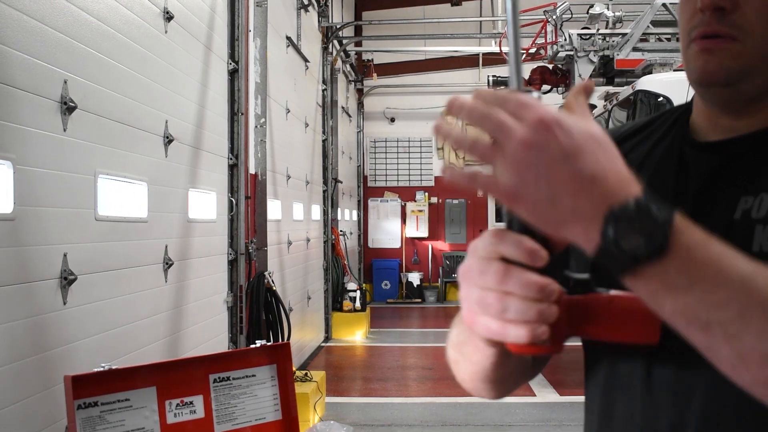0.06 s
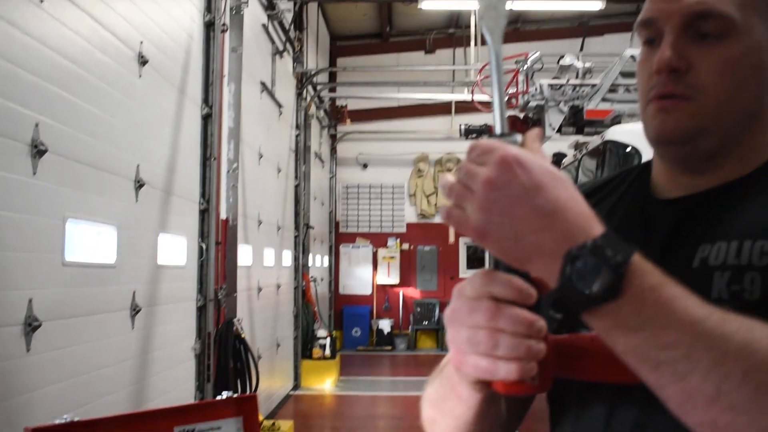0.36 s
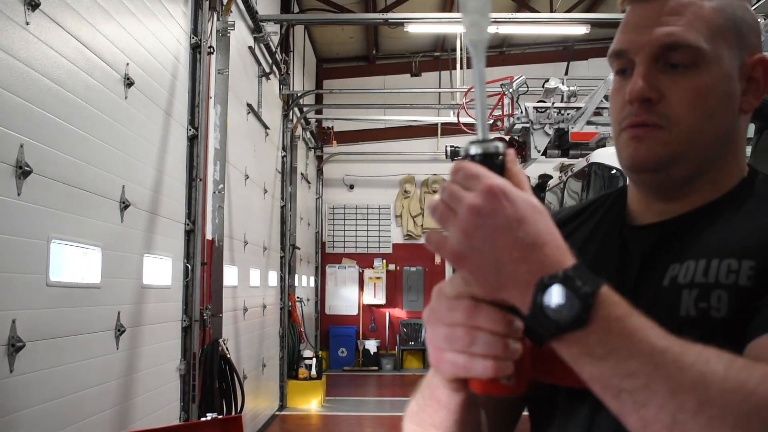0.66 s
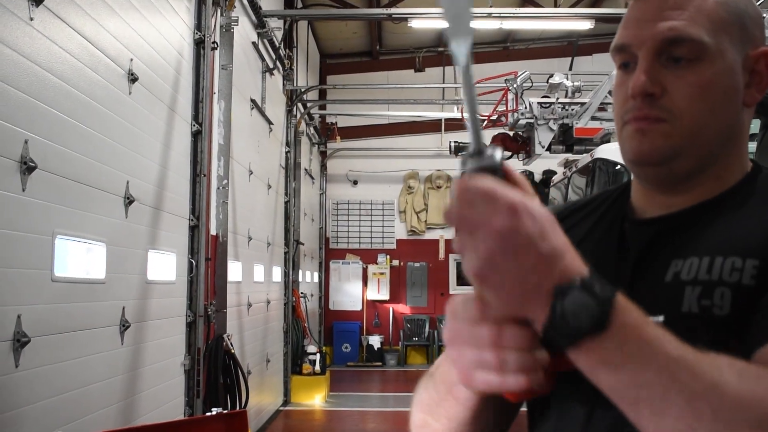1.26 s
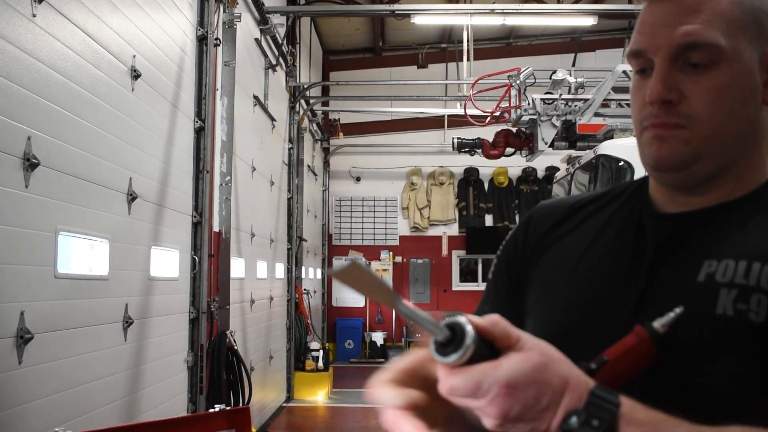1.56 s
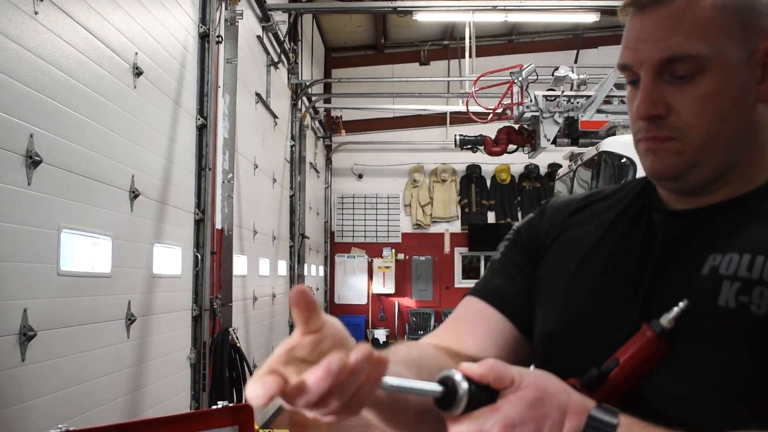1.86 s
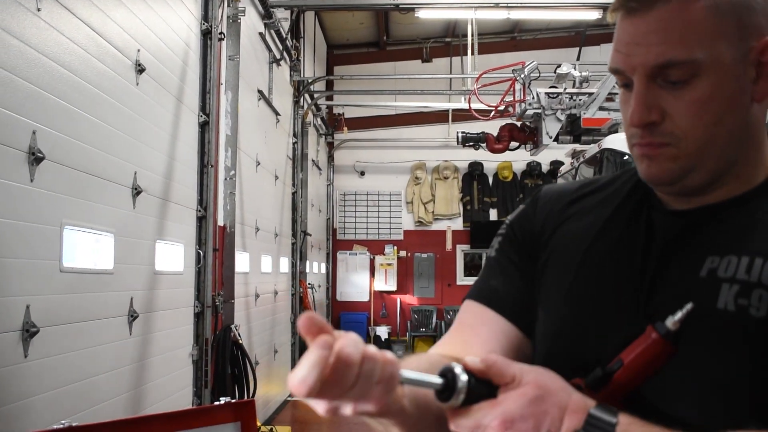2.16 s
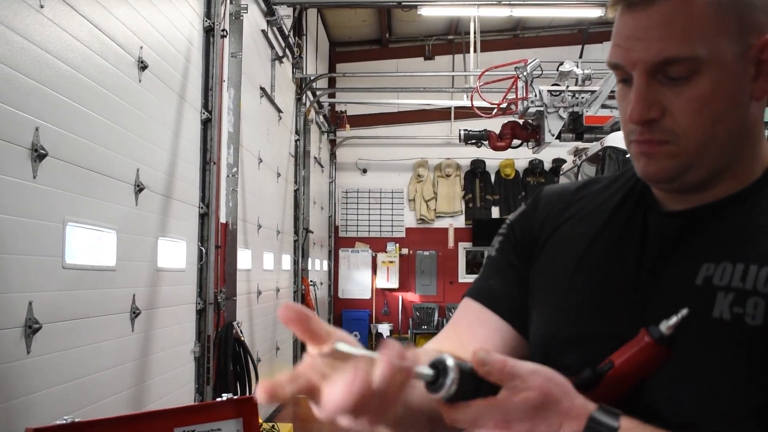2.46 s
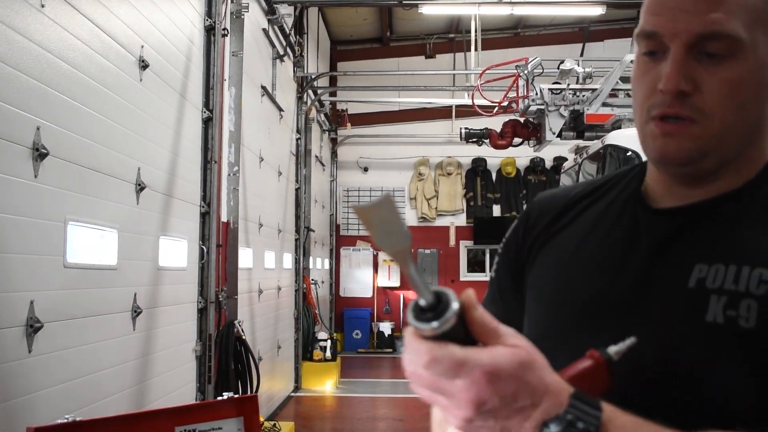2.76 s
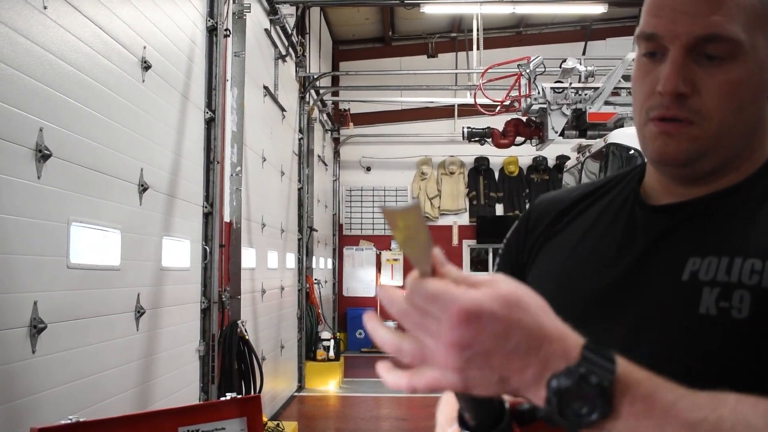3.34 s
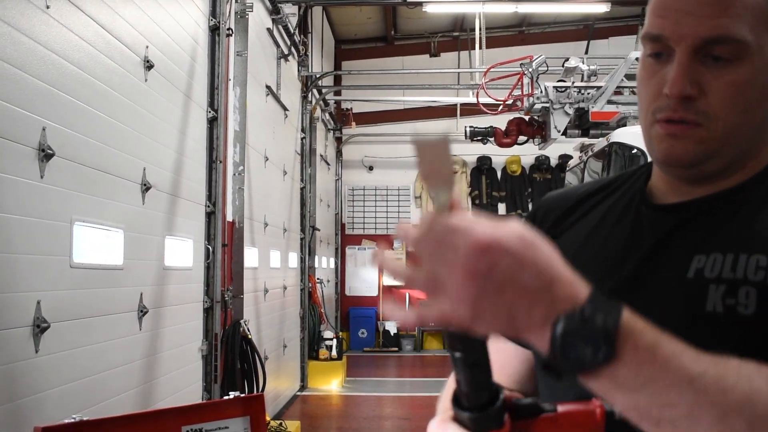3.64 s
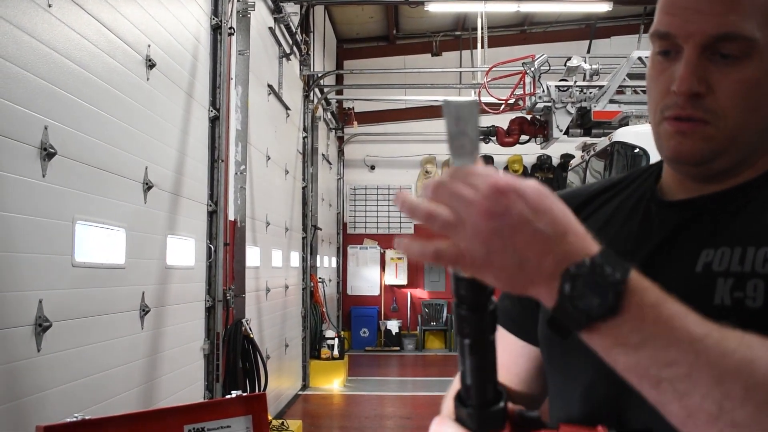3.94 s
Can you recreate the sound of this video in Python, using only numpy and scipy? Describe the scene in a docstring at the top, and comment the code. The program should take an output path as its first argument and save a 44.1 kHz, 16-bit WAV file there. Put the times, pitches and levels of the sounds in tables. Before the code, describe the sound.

An air hammer's steel parts are handled close to the microphone. Its collar unscrews in gritty clicks, the chisel bit scrapes out and taps, then both clank back on, in a large, echoing garage with ventilation hum.

```python
"""An air hammer is handled up close in a large, hard-walled garage, over a bed of ventilation and mains hum.
First its retainer collar is unscrewed in gritty clicks. At 1.7 s the chisel bit scrapes out of the barrel,
then taps the retainer. From 3.1 s bit and retainer clank back on, among duller knocks of the loose parts.
Every steel contact is a short crack plus a hand-damped ring, trailed by the hall. After the loudest clanks
a limiter ducks the whole mix and lets it swell back."""
import sys
import numpy as np
from scipy import signal
from scipy.fft import rfft, irfft, next_fast_len
from scipy.io import wavfile
from scipy.ndimage import uniform_filter1d, minimum_filter1d, map_coordinates

SR = 44100
rng = np.random.default_rng(int(sys.argv[2]) if len(sys.argv) > 2 else 0)


def put_to_file(sound):
    """Save the sound as 16-bit audio at rate SR, in the file named by the first command-line argument."""
    columns = np.atleast_2d(sound).T  # one column per channel
    safe = np.clip(columns, -1, 1)
    whole_steps = np.round(safe * 32767)
    wavfile.write(sys.argv[1], SR, whole_steps.astype(np.int16))


N = 176400  # 4 s

# spectra of the ventilation rush, a hollow drone in the room tone and the housing's thud (f/Hz, level/dB)
VENT_EQ = [(15, -52), (25, -41), (64, -11), (92, -18), (114, -2.5), (149, -5), (200, -2), (326, -7.5),
           (363, -3.5), (405, -10), (560, -8), (677, -7.5), (1040, -5.5), (1840, -5), (4610, -18),
           (6740, -22.5), (16000, -49.5)]
DRONE_EQ = [(200, -14.5), (400, -6.5), (545, -0.5), (620, -4.5), (760, -15), (1500, -52)]
THUD_EQ = [(20, -42), (100, -5), (400, -7), (1000, 10), (1600, -18), (3000, -45)]
# fader ride of the drone (t/s, level/dB)
DRONE_FADER = [(0, -56.5), (.3, -49), (.42, -53), (.52, -49), (.62, -51), (.72, -73), (1.0, -56),
               (1.6, -65), (2.15, -51), (2.5, -71), (2.72, -53), (2.8, -59), (2.86, -48.5), (2.92, -54),
               (3.1, -55.5), (4, -107)]
# steady tones of the hum (f/Hz, level/dB)
HUM_TONES = [(77, -72.5), (120, -64), (1105, -68.5)]
# reverb time of the garage (f/Hz, t60/s)
HALL_DECAY = [(200, 1.2), (2000, 0.95), (5000, 0.72), (8000, 0.68), (11000, .44), (16000, 0.18)]

# cue lists of the steel contacts (t/s, level/dB, crack t60/s, tilt/(dB per octave), ring level/dB)
COLLAR_HITS = [(.1416, -26, 0.0073, -4, -5), (.2023, -33.5, .008, -6, 9), (.2105, -37, 0.0093, -4, 8),
               (.315, -47, .01, -6, 9), (.345, -33, 0.0051, -5, -1), (.496, -33, 0.031, 8, 8),
               (.516, -24.5, 0.0068, 15, 5.5), (.519, -11, 0.0041, 2.5, -6), (.523, -27, 0.023, 2, -3),
               (.722, -39, 0.0093, 18, -7), (.763, -32, 0.013, 15.5, -6), (.881, -25, 0.011, 4.5, 9),
               (.887, -13, 0.0084, -2.5, 0), (.9185, -28, 0.0073, -9, -9), (.9255, -18, 0.03, 0, 8),
               (.9312, -12, 0.019, 3.5, 0.5), (.937, -19, 0.014, -2, 2), (.9465, -22, 0.0095, 1, -9),
               (.9895, -18, 0.012, 4.5, -4), (.993, -16, 0.0081, 1.5, 2.5), (.998, -27, 0.014, -8, 0),
               (1.032, -22.5, 0.025, -1.5, -1.5), (1.040, -17, 0.014, -1, -3), (1.079, -27, 0.013, -5, -5),
               (1.0838, -16.5, 0.01, -3, 2), (1.122, -20.5, 0.018, 0, 5), (1.1295, -21.5, 0.012, 1, -5),
               (1.136, -29, 0.013, 2, 6), (1.1817, -20.5, .014, -3, -2), (1.1867, -24, 0.011, -3, -9),
               (1.2245, -25.5, 0.027, -5, 12), (1.231, -23, 0.026, -3, -2), (1.2363, -24, 0.0056, -4, 3),
               (1.289, -32.5, 0.0097, -6, -9), (1.340, -30, 0.016, -7.5, 7.5), (1.349, -29, 0.026, -5.5, 3),
               (1.449, -33.5, 0.017, -7, 10.5), (1.463, -33, 0.06, -5.5, 10),
               (1.4872, -18, 0.007, 2.5, -20), (1.572, -41, .006, 9, -4)]  # the collar turns
SLIDE_HITS = [(1.7188, -25.5, 0.026, -4, 1), (1.7255, -30, .014, 4, 6), (1.7302, -19, 0.0098, -3, -1),
              (1.7365, -19.5, .006, 0, -4), (1.7913, -24, 0.011, 2, 8), (1.7982, -15, 0.019, 0, -1)]  # the bit scrapes out of the barrel
BIT_HITS = [(2.119, -30, 0.027, 0, -8), (2.1233, -17.5, 0.014, -2.5, -16), (2.138, -23.5, .035, -2, -12),
            (2.155, -30, 0.034, 16, -12), (2.1648, -17.5, 0.0082, -6.5, -10), (2.167, -20, 0.017, 4, 3.5),
            (2.173, -26, .012, -5, 3), (2.2132, -26.5, .006, 16, -18), (2.343, -34.5, .015, 0, -10),
            (2.359, -30.5, 0.037, -3.5, -12), (2.377, -23, 0.062, 6, -10), (2.3852, -6, 0.011, 1.5, -2),
            (2.3907, -23, 0.0074, -5.5, 1)]  # the loose bit taps the retainer
SHANK_HITS = [(3.130, -35.5, 0.065, -6.5, -8), (3.142, -33, 0.015, -9, 4), (3.1585, -24, .022, 1, 3),
              (3.168, 15, 0.0077, -1.1, -1), (3.1745, -7.5, 0.0081, 2, -1), (3.4475, -18.5, .006, 1, -12),
              (3.456, -30, 0.0091, -2, 0), (3.4613, 7.5, 0.0098, 0, 1.5)]  # the bit's shank drops into the barrel
SEAT_HITS = [(3.704, -27, 0.023, -4, 1), (3.726, -19, 0.008, -2, 0), (3.7305, -20.5, 0.016, -2.5, 3),
             (3.7341, 11, 0.0059, 0.5, -6), (3.7375, -8.5, 0.01, 1, 10)]  # the retainer meets the barrel
KNOCK_HITS = [(3.3025, -15.5, 0.014, -1.5, -5), (3.6138, -11, 0.0047, 1.5, 0.5),
              (3.845, -21.5, 0.04, 6, -4), (3.888, -17, 0.0057, -3, 3), (3.9748, -19, 0.01, 2, -19),
              (3.995, -16, 0.046, 3.5, -9)]  # loose parts knock dully
# tone colour of each part's crack (f/Hz, level/dB)
COLLAR_EQ = [(200, -29), (1200, -19.5), (2200, -6), (3400, -7), (5000, -0.5), (6200, 2.5), (8300, -2),
             (9800, -12.5), (12000, -33), (16000, -42)]
SLIDE_EQ = [(200, -23.5), (1200, -15), (2300, -3.5), (3100, -5), (4400, 1), (6000, -2), (7200, -0.5),
            (9500, -8.5), (11800, -24), (16000, -45)]
BIT_EQ = [(60, -33), (330, -21), (900, -19), (2200, -2.5), (3500, -0.5), (5900, -2), (8000, -7),
          (10000, -10), (11800, -35), (13700, -43), (15000, -55)]
SHANK_EQ = [(60, -26), (500, -17.5), (1300, -16.5), (2200, -2.5), (3300, -7.5), (4400, 4), (6000, 2),
            (7500, 6), (10800, -5.5), (11800, -18), (13000, -15), (16000, -27.5)]
SEAT_EQ = [(100, -31), (400, -12), (1000, -15.5), (1500, -11.5), (2050, -15), (3000, -7.5), (4300, -5.5),
           (5400, -6.5), (6800, 1), (8500, -2.5), (11000, -14), (13000, -24), (16000, -27)]
KNOCK_EQ = [(200, -26), (480, -16), (750, 3.5), (1150, -1), (1700, -1.5), (3300, -1), (5000, 3), (6200, 1),
            (8800, -8.5), (10500, -21), (16000, -42)]
# ringing modes of each part (f/Hz, level/dB, t60/s)
COLLAR_RING = [(2010, -32, 0.024), (4910, -12, 0.03), (5230, -12.5, 0.024), (6860, -34, 0.017),
               (7330, -16, 0.022), (8230, -14, 0.023), (10870, -32.5, 0.016), (12650, -47, 0.016),
               (14400, -51, 0.016)]
SLIDE_RING = [(2210, -22, .02), (4470, -24, 0.0096), (4930, -13.5, 0.031), (6860, -11.5, 0.027),
              (7660, -18.5, 0.034), (10200, -26.5, 0.03)]
BIT_RING = [(2220, -26, .03), (4350, -26, 0.022), (4800, -26, 0.022), (7070, -14, 0.022),
            (9870, -16.5, 0.049), (13550, -38, 0.027)]
SHANK_RING = [(2370, -26, 0.024), (4360, -17.5, 0.0072), (4950, -19, 0.034), (7140, -11.5, 0.029),
              (7410, -12, 0.037), (9350, -28, 0.029), (10840, -20.5, 0.023), (14730, -29, .025)]
SEAT_RING = [(2024, -17.5, 0.016), (4330, -15.5, 0.021), (6340, -29, .025), (6670, -11.5, 0.025),
             (6880, -19.5, 0.052), (7800, -19, .05), (9180, -17, 0.037), (9260, -20.5, 0.048)]
KNOCK_RING = [(1510, -13, 0.016), (1810, -11, 0.0084), (4750, -20, 0.017), (6300, -7, 0.0092),
              (8740, -5, 0.0071)]

VENT_DB = -49
NEAR_ECHO_S, NEAR_ECHO_DB, DOOR_ECHO_S, DOOR_ECHO_DB = 0.0056, -12.5, 0.02, -21.5
HALL_BUILD_S = 0.0075
THUD_S, THUD_DB, THUD_T60_S = 3.4613, -19, 0.014
RISE_S, RISE_T60_S = 0.00066, 0.014  # attack of a contact with this t60; longer ones scrape in more slowly
CHATTER_DB, CHATTER_T60_S = -11, 0.024  # fine rattle after each contact
EVENNESS = 0.74  # 0-1: how evenly a contact excites all frequencies
RING_SCATTER_DB = 2
CEILING, RELEASE_DB_PER_S, ATTACK_S, HIGH_CUT_HZ = 0.7, 48.5, 0.0006, 16000


def amp(db):
    """Decibels to gain."""
    return 10 ** (np.asarray(db) / 20)


def decay(t, t60):
    """An exponential fade, 60 dB down at t60."""
    return np.exp(-np.log(1000) * t / t60)


def along(points, hz):
    """Read (Hz, value) points on a log frequency axis."""
    freqs, values = np.transpose(points)
    return np.interp(np.log(hz + 1), np.log(freqs + 1), values)


def wobble(rate):
    """A smooth random drift with `rate` knots a second."""
    knots = rng.standard_normal(int(N * rate / SR) + 4)
    return map_coordinates(knots, [np.arange(N) * rate / SR])


def filtered(x, response):
    """EQ x with a gain given as a function of frequency."""
    size = next_fast_len(N + SR // 2)
    return irfft(rfft(x, size) * response(np.fft.rfftfreq(size, 1 / SR)), size)[:N]


def noise(eq):
    """Coloured noise of rms 1."""
    x = filtered(rng.standard_normal(N), lambda hz: amp(along(eq, hz)))
    return x / np.sqrt(np.mean(x ** 2) + 1e-20)


def minimum_phase(gain):
    """A response with this gain and no pre-ring, so attacks stay crisp."""
    cepstrum = irfft(np.log(np.maximum(gain, 1e-6)))
    half = len(cepstrum) // 2
    cepstrum[1:half] *= 2
    cepstrum[half + 1:] = 0
    return np.exp(rfft(cepstrum))


def room_tone():
    """The bed: ventilation rush, slightly unsteady hum and a hollow drone that swells and fades."""
    t = np.arange(N) / SR
    hum = np.zeros(N)
    for hz, db in HUM_TONES:
        peak = np.sqrt(2) * amp(db + 1.4 * wobble(3.83))
        hum += peak * np.sin(2 * np.pi * hz * t + 0.23 * wobble(3))
    drone = amp(np.interp(t, *np.transpose(DRONE_FADER))) * noise(DRONE_EQ)
    ventilation = amp(VENT_DB + 0.13 * wobble(2.33)) * noise(VENT_EQ)
    return ventilation + hum + drone


def hall_tail():
    """One diffuse decay off the hard walls, energy 1; the treble dies first."""
    hz, t, bands = signal.stft(rng.standard_normal(SR), SR, nperseg=256)
    _, tail = signal.istft(bands * decay(t, along(HALL_DECAY, hz)[:, None]), SR, nperseg=256)
    tail *= 1 - np.exp(-(np.arange(len(tail)) / SR / HALL_BUILD_S) ** 2)
    return tail / np.linalg.norm(tail)


def garage(x, wet_db, size=8192):
    """Direct sound, slaps off the body and the door, and a hall tail that changes as the tool moves."""
    hall = np.zeros(N + 2 * SR)
    for start in range(0, N, size):
        block = x[start:start + size]
        if np.any(block):
            reverb = signal.fftconvolve(block, hall_tail())
            hall[start:start + len(reverb)] += reverb
    near_slap = amp(NEAR_ECHO_DB) * np.pad(x, (round(NEAR_ECHO_S * SR), 0))[:N]
    door_slap = amp(DOOR_ECHO_DB) * np.pad(x, (round(DOOR_ECHO_S * SR), 0))[:N]
    return x + near_slap + door_slap + amp(wet_db) * hall[:N]


def housing_thud():
    """The shank bottoms out and jolts the housing: a short, dull burst of noise."""
    t = np.arange(N) / SR - THUD_S
    return amp(THUD_DB) * (t > 0) * decay(np.abs(t), THUD_T60_S) * noise(THUD_EQ)


def steel_hits(hits, eq, modes, detune, size=8192):
    """Steel on steel: each contact cracks, chatters and rings modes that the shifting grip detunes."""
    track = np.zeros(N + 2 * size)
    t, hz = np.arange(size) / SR, np.fft.rfftfreq(size, 1 / SR)
    octaves = np.log2(np.clip(hz, 500, 12000) / 5000)  # the tilt pivots at 5 kHz
    chatter = amp(CHATTER_DB) * decay(t, CHATTER_T60_S)
    for start_s, db, t60, tilt_db, ring_db in hits:
        attack = 1 - np.exp(-t / (RISE_S * (t60 / RISE_T60_S) ** 2))
        fade = decay(t, t60)
        burst = rfft(attack * np.hypot(fade, chatter) * rng.standard_normal(size))
        burst /= (np.abs(burst) + 0.079 * np.abs(burst).mean()) ** EVENNESS  # iron out chance peaks
        colour = minimum_phase(amp(along(eq, hz) + tilt_db * octaves))
        crack = irfft(burst * colour) * (t < t[-1] / 2)
        crack *= 0.5 * np.linalg.norm(fade) / np.linalg.norm(crack)  # same energy whatever the EQ
        ring = np.zeros(size)
        for mode_hz, mode_db, mode_t60 in modes:
            accent_db = RING_SCATTER_DB * rng.standard_normal() + tilt_db * np.interp(mode_hz, hz, octaves)
            pitch_hz = mode_hz * (1 + detune * rng.standard_normal())
            partial = np.sin(2 * np.pi * (pitch_hz * t + rng.random()))
            ring += amp(mode_db + accent_db) * decay(t, mode_t60) * partial
        track[round(start_s * SR):][:size] += amp(db) * (crack + amp(ring_db) * attack * ring)
    return track[:N]


def air_hammer_handling():
    """The foreground: steel parts click, scrape and clank, each with its own reverb send."""
    collar = garage(steel_hits(COLLAR_HITS, COLLAR_EQ, COLLAR_RING, detune=0.014), wet_db=-14.5)
    slide = garage(steel_hits(SLIDE_HITS, SLIDE_EQ, SLIDE_RING, detune=0.015), wet_db=-13.5)
    taps = garage(steel_hits(BIT_HITS, BIT_EQ, BIT_RING, detune=0.003), wet_db=-15)
    shank_clanks = steel_hits(SHANK_HITS, SHANK_EQ, SHANK_RING, detune=0.003)
    shank = garage(shank_clanks + housing_thud(), wet_db=-14)
    seat = garage(steel_hits(SEAT_HITS, SEAT_EQ, SEAT_RING, detune=0.0023), wet_db=-13)
    knocks = garage(steel_hits(KNOCK_HITS, KNOCK_EQ, KNOCK_RING, detune=0.013), wet_db=-17.5)
    return collar + slide + taps + shank + seat + knocks


def scene():
    """The tool over the room tone, in mono."""
    return (air_hammer_handling() + room_tone())[None]


def record(dry):
    """Master chain: a fast limiter ducks at peaks and recovers steadily, then a steep high cut."""
    mix = dry[0]
    over_db = 20 * np.log10(np.maximum(np.abs(mix) / CEILING, 1))
    recovery_db = RELEASE_DB_PER_S * np.arange(N) / SR
    duck_db = np.maximum.accumulate(over_db + recovery_db) - recovery_db
    width = round(ATTACK_S * SR)
    gain = uniform_filter1d(minimum_filter1d(amp(-duck_db), width), width)
    return filtered(mix * gain, lambda hz: 1 / np.sqrt(1 + (hz / HIGH_CUT_HZ) ** 160))[None]


dry = scene()
out = record(dry)
put_to_file(out)
```